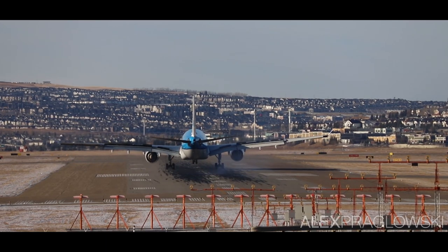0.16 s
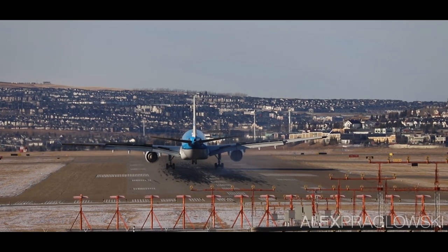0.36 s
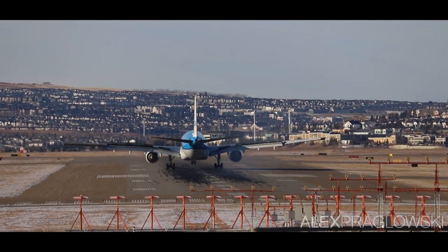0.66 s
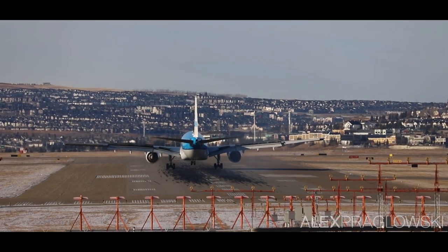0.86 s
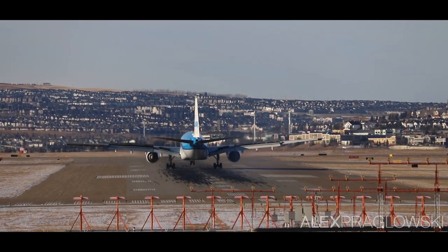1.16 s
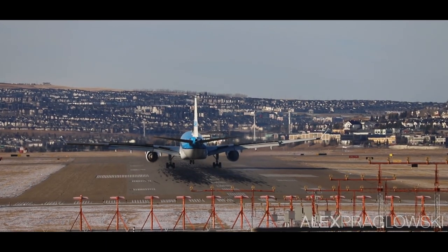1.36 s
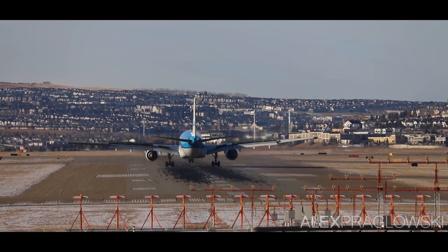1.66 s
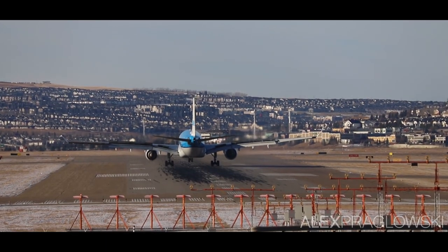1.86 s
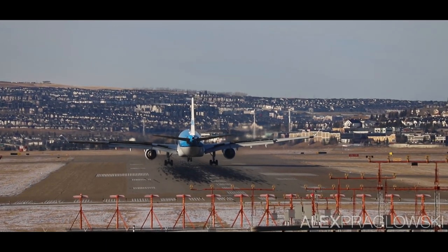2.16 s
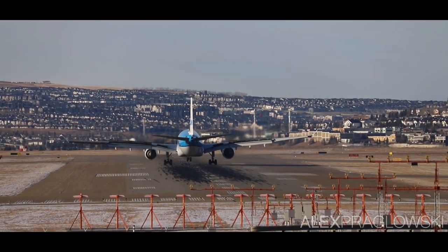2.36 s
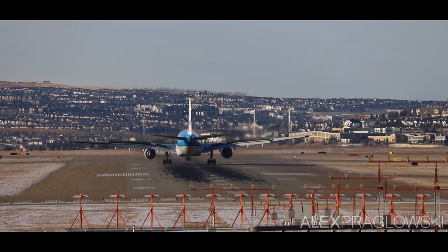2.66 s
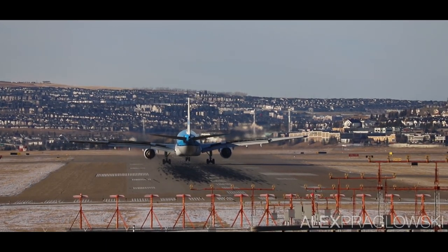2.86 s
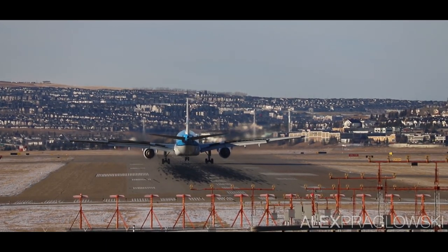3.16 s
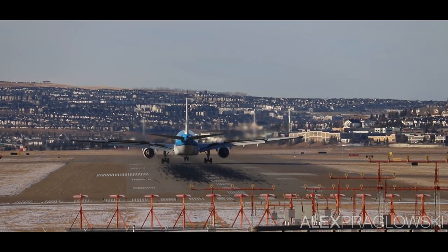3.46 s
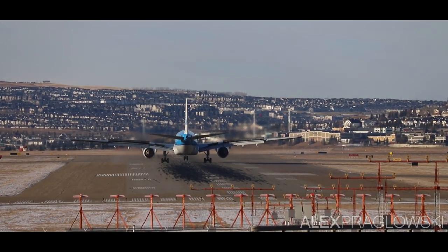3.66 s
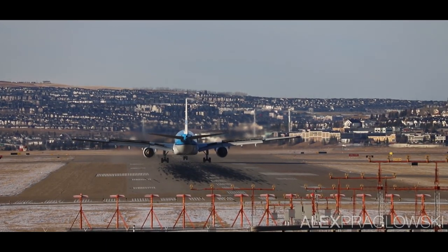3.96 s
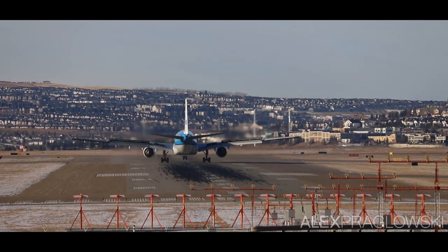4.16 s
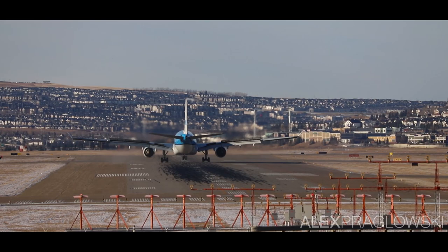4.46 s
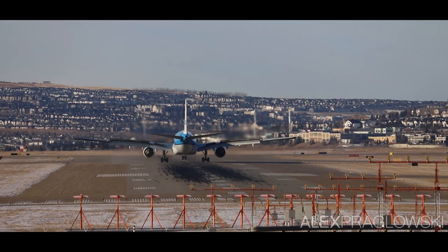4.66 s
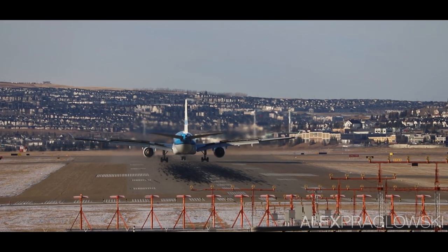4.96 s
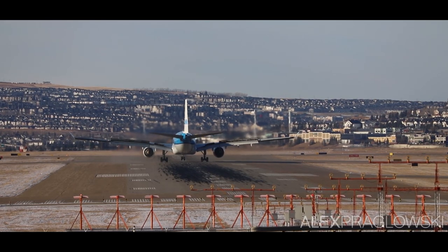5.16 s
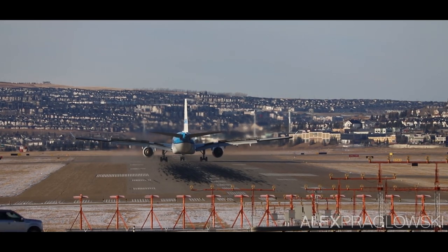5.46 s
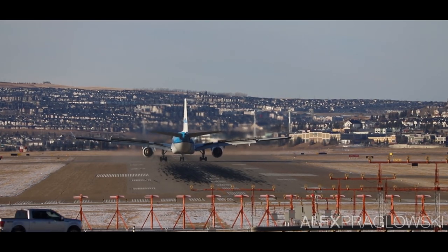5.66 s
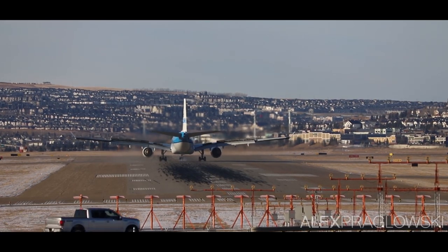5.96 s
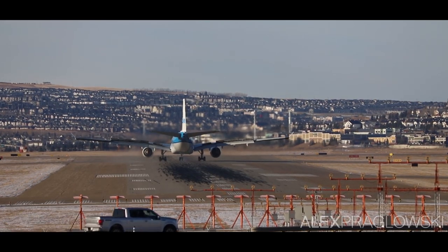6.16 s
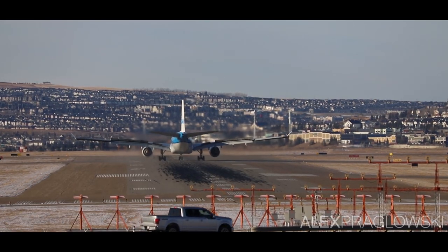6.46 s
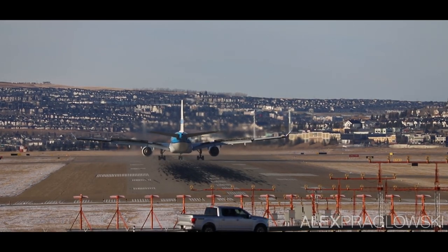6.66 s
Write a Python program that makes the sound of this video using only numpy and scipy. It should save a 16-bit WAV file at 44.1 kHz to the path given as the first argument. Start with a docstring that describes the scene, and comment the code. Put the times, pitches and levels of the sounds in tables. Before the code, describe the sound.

A distant airliner's deep, wavering roar with a thin whine fades along a windy runway, low wind thumps easing before faint gritty tyre crackles.

```python
"""A windy runway: a twin-engine airliner rolls away in reverse thrust while a pickup truck passes on grit.
The engines are shaped noise, a dull roar under a fading rush, with wandering resonant swells.
Two wavering sine tones make the thin fan whine, one of them coming and going.
Low noise in gusts buffets the microphone, coloured noise makes the tyres, sparse cracks make an early
tick and the later grit, and a faint hiss lies beneath. A compressor ducks it all under each gust."""
import sys
import numpy as np
from scipy import signal
from scipy.fft import rfft, irfft, next_fast_len
from scipy.io import wavfile
from scipy.ndimage import uniform_filter1d, map_coordinates

SR = 44100
rng = np.random.default_rng(int(sys.argv[2]) if len(sys.argv) > 2 else 0)


def transcribe(u):
    """Save the signal u as a 16-bit wav file named by the first command-line argument.

    u: samples, shape (n,) or (channels, n), limited to [-1, 1]; the rate is SR.
    q: integer samples, one column per channel.
    """
    v = np.clip(np.atleast_2d(u).T, -1, 1)
    q = np.round(v * 32767).astype(np.int16)
    wavfile.write(sys.argv[1], SR, q)


N = 300179

# All source levels are set ahead of the compressor.
# Colour of the microphone hiss: (frequency [Hz], relative level [dB])
HISS_SPECTRUM = [(800, -13), (2500, 9.5), (4000, 4), (6500, -0.5), (11000, -2), (15500, -4)]
# Colour of the large wind eddies: (frequency [Hz], relative level [dB])
LARGE_EDDY_SPECTRUM = [(8, -22.5), (22, -1), (42, 2), (68, -4.5), (100, -14.5), (150, -26), (300, -32),
                       (1000, -90)]
# Colour of the smaller, higher wind eddies: (frequency [Hz], relative level [dB])
SMALL_EDDY_SPECTRUM = [(30, -18), (62, 1.5), (85, 1.5), (120, -4), (170, -14.5), (300, -26.5),
                       (1000, -80.5)]
# Strength of the breeze, ahead of WIND_LIFT_DB: (time [s], level [dB])
BREEZE_TRACK = [(0, -10.5), (0.75, -14.5), (1.3, -15.5), (2.1, -12.5), (2.9, -16), (3.9, -20.5),
                (4.7, -24.5), (5.25, -29), (5.6, -24), (6.0, -17), (6.8, -20)]
# Gusts and lulls at the microphone: (time [s], gain [dB])
GUSTS_AND_LULLS = [(0.092, 7.5), (0.52, 7.5), (0.62, -1), (0.83, 3.5), (0.93, -1.5), (1.07, 6),
                   (1.15, -4.5), (1.24, -6), (1.41, 3), (1.67, 6), (1.75, -6), (1.95, 4.5), (2.069, 5.5),
                   (2.48, 5), (3.17, 2.5), (3.24, -3), (4.32, 3), (4.58, 4), (4.78, -3.5), (5.0, 5.5),
                   (5.75, -7.5), (5.96, 5), (6.04, -6.5)]
# Colour of tyres, ticks and crunches: (frequency [Hz], relative level [dB])
CRUNCH_SPECTRUM = [(500, -10), (1100, 6), (1400, 6), (1800, 7), (2300, -3), (3100, -10), (3800, -7),
                   (4500, -17), (9000, -26), (15000, -37)]
# Ticks and crunches, an early tick at the microphone, then grit under a tyre:
# (start time [s], level [dB], twice the rise time [s])
TICKS_AND_CRUNCHES = [(0.247, -39.5, .010), (6.05, -52, .06), (6.501, -38, .007), (6.512, -40.5, .004),
                      (6.533, -37, .004), (6.541, -41, .004), (6.565, -49, .005), (6.601, -39.5, .005),
                      (6.610, -40, .004)]
# Swells of the louder fan's whine: (time [s], peak level [dB], half length [s])
FAN_SWELLS = [(0.5, -44, 0.34), (1.48, -46.5, 0.2), (2.9, -43, 0.3)]
# Deep swell of the reversed jets: (time [s], centre frequency [Hz], level [dB])
BOOM_TRACK = [(0, 199.9, -31.5), (2.4, 206.1, -23.5), (2.7, 221.6, -15.5), (3.1, 199.2, -21.5),
              (3.9, 209.6, -25), (4.3, 255, -19), (4.75, 272.2, -21.5), (5.1, 270.1, -18),
              (5.5, 251.6, -21.5), (5.9, 195, -18.5), (6.2, 188.1, -27.5), (6.6, 181.9, -22)]
# Higher, hollow swell: (time [s], centre frequency [Hz], level [dB])
HOWL_TRACK = [(0, 399, -25), (2.2, 400, -28), (3.45, 470.2, -21.5), (3.95, 420, -18.5), (4.2, 334.9, -20.5),
              (4.55, 320.6, -21), (4.8, 437.7, -32), (5.3, 445.3, -21), (5.8, 439.8, -27.5),
              (6.8, 457, -30)]
# Narrow drone of the engines: (time [s], centre frequency [Hz], level [dB])
DRONE_TRACK = [(0, 338.3, -17.5), (0.5, 338.2, -22.5), (0.9, 336.6, -13.5), (1.22, 335, -16.5),
               (1.36, 331.7, -24.5), (1.85, 321, -16.5), (2.55, 332, -23), (2.9, 330, -36.5)]
# Colour of the jet roar: (frequency [Hz], relative level [dB])
ROAR_SPECTRUM = [(30, -22.5), (80, -8), (130, -5), (210, 0), (290, -1), (380, 0), (500, -1.5), (620, -6.5),
                 (760, -15.5), (950, -27), (1500, -53), (3000, -100)]
# Colour of the jet rush: (frequency [Hz], relative level [dB])
RUSH_SPECTRUM = [(400, -27), (750, 7), (950, 1), (1200, -1.5), (1500, -8), (1720, -10.5), (2000, -18.5),
                 (2600, -28), (4000, -41), (8000, -59.5)]
# Brief surges and dips of the rush, carried by the air: (time [s], gain [dB])
RUSH_SURGES = [(0.62, 1.5), (1.29, 0), (2.45, -2), (2.648, -0.5), (3.0, 3.5), (3.76, 1.5), (5.66, 2.5),
               (6.05, 2)]

# Half lengths below are where a bell-shaped swell has fallen to 1/e.
HISS_DB = -56.5
WIND_LIFT_DB = 1.0
GUST_HALF_S, SURGE_HALF_S = 0.048, 0.05
# Small eddies: level over the large ones in a 0 dB wind, then dB gained per dB of wind
SMALL_EDDIES_DB, SMALL_EDDIES_GROW = -1, 0.35
# The pickup: time when nearest, half length, peak level
TYRES_S, TYRES_HALF_S, TYRES_DB = 6.4, 2.2, -55.5
# The whine climbs as the aircraft brakes and its Doppler shift shrinks; BRAKE_S sets the slope
FAN_START_HZ, FAN_END_HZ, BRAKE_MID_S, BRAKE_S = 1615, 1656, 2.45, 0.55
FAN_DB, SECOND_FAN_DB, SECOND_FAN_BELOW_HZ = -59, -59, 33
# The lowest part of the roar swells once: time, half length, centre, peak level
RUMBLE_S, RUMBLE_HALF_S, RUMBLE_HZ, RUMBLE_DB = 3.6, 1.2, 139, -27
# The engines fade steadily as the aircraft rolls away: level at the start, loss
ROAR_DB, ROAR_FADE_DB_PER_S = -15, 0.3453
RUSH_DB, RUSH_FADE_DB_PER_S = -31, 0.94
TOP_HZ = 15730  # upper band limit


def amp(db):
    """Decibels to gain."""
    return 10 ** (np.asarray(db) / 20)


def unit(x):
    """Scale to rms 1."""
    return x / np.sqrt(np.mean(np.abs(x) ** 2) + 1e-20)


def curves(rows):
    """One value per sample for each column after the time."""
    times, *columns = np.transpose(rows)
    return [np.interp(np.arange(N) / SR, times, column) for column in columns]


def wobble(rate):
    """A smooth random curve, rate knots a second."""
    knots = rng.standard_normal(int(N * rate / SR) + 4)
    return map_coordinates(knots, [np.arange(N) * rate / SR])


def bump(s, half_s):
    """A bell that rises to 1 at time s."""
    return np.exp(-((np.arange(N) / SR - s) / half_s) ** 2)


def step(s, rise_s):
    """A smooth change from 0 to 1 around time s."""
    return .5 + .5 * np.tanh((np.arange(N) / SR - s) / (2 * rise_s))


def fading(start, per_s):
    """A value that falls steadily with time."""
    return start - per_s * np.arange(N) / SR


def pulse(age):
    """A push that rises to 1 at age one half and dies away."""
    return 2 * age * np.exp(1 - 2 * age)


def filtered(x, response):
    """x times a response of frequency."""
    size = next_fast_len(N + SR // 2)
    spectrum = rfft(x, size) * response(np.fft.rfftfreq(size, 1 / SR))
    return irfft(spectrum, size)[:N]


def coloured(x, spectrum):
    """x shaped by (frequency, level) points on a log frequency axis, at rms 1."""
    f, db = np.transpose(spectrum)
    return unit(filtered(x, lambda hz: amp(np.interp(np.log(hz + 1), np.log(f), db))))


def turbulence(patchy_db):
    """Noise whose neighbouring bands fade and swell separately, as sound does through eddying air."""
    bands = signal.stft(rng.standard_normal(N), nperseg=1024)[2]
    field = rng.standard_normal(bands.shape)
    field = uniform_filter1d(field, size=9, axis=0)   # smooth across frequency
    field = uniform_filter1d(field, size=10, axis=1)  # smooth across time
    return signal.istft(bands * amp(patchy_db * unit(field)))[1][:N]


def resonance(centre_hz, width_hz):
    """Narrow noise of rms 1 around a moving centre, width_hz across at half amplitude."""
    def skirt(hz):
        return 1 / (1 + (2 * hz / width_hz) ** 2)
    in_phase = filtered(rng.standard_normal(N), skirt)
    quadrature = filtered(rng.standard_normal(N), skirt)
    carrier = np.exp(2j * np.pi * np.cumsum(centre_hz) / SR)
    return unit(np.real((in_phase + 1j * quadrature) * carrier))


def hiss():
    """The faint, steady hiss of the microphone."""
    return amp(HISS_DB) * coloured(rng.standard_normal(N), HISS_SPECTRUM)


def wind():
    """Eddies shed at the microphone push it in low lumps; gusts ride the breeze, stronger wind is brighter."""
    breeze_db, = curves(BREEZE_TRACK)
    gust_db = sum(db * bump(s, GUST_HALF_S) for s, db in GUSTS_AND_LULLS)
    buffet = amp(breeze_db + 1.3 * wobble(10) + gust_db)
    air = rng.standard_normal(N)  # one airflow drives both sizes of eddy
    large = coloured(air, LARGE_EDDY_SPECTRUM)
    small_gain = amp(SMALL_EDDIES_DB) * buffet ** SMALL_EDDIES_GROW
    eddies = unit(large + small_gain * coloured(air, SMALL_EDDY_SPECTRUM))
    # even out the chance loud and soft lumps, so the gusts set the level
    strength = np.sqrt(np.abs(uniform_filter1d(eddies ** 2, size=3000)) + 0.12)
    return amp(WIND_LIFT_DB) * buffet * unit(eddies / strength)


def tyres():
    """The soft rolling noise of the pickup swells as it comes near."""
    return amp(TYRES_DB) * bump(TYRES_S, TYRES_HALF_S) * coloured(rng.standard_normal(N), CRUNCH_SPECTRUM)


def ticks_and_crunches():
    """Each tick or crunch is a quick cluster of tiny cracks."""
    t = np.arange(N) / SR
    pressure = sum(amp(db) * pulse(np.maximum(t - s, 0) / length) for s, db, length in TICKS_AND_CRUNCHES)
    cracks = rng.standard_normal(N) * (rng.random(N) < .2)  # about one sample in five cracks
    return pressure * coloured(cracks, CRUNCH_SPECTRUM)


def fan(pitch_hz, level, waver_hz, flicker_db):
    """One fan's blade-passing tone: a sine that wavers in pitch and flickers in level."""
    phase = 2 * np.pi * np.cumsum(pitch_hz + waver_hz * wobble(30)) / SR
    return level * amp(flicker_db * wobble(13)) * unit(np.sin(phase))


def whine():
    """The two fans turn at slightly different speeds; the air carries the louder one over in swells."""
    pitch_hz = FAN_START_HZ + (FAN_END_HZ - FAN_START_HZ) * step(BRAKE_MID_S, BRAKE_S)
    swell_power = sum((amp(db) * bump(s, half_s)) ** 2 for s, db, half_s in FAN_SWELLS)
    level = np.sqrt(amp(FAN_DB) ** 2 + swell_power)
    first = fan(pitch_hz, level, waver_hz=1.2, flicker_db=1)
    second = fan(pitch_hz - SECOND_FAN_BELOW_HZ, amp(SECOND_FAN_DB), waver_hz=3, flicker_db=2.5)
    return first + second


def swell(track, width_hz, patchy_db):
    """A resonant band of the roar that wanders as the aircraft rolls on, broken up by the eddying air."""
    centre_hz, db = curves(track)
    return amp(db + patchy_db * wobble(14)) * resonance(centre_hz, width_hz)


def swells():
    """Resonant bands of the roar; the drone leads, then gives way to the others."""
    rumble_tone = resonance(np.full(N, RUMBLE_HZ), width_hz=25)
    rumble = amp(RUMBLE_DB) * bump(RUMBLE_S, RUMBLE_HALF_S) * rumble_tone
    boom = swell(BOOM_TRACK, width_hz=76, patchy_db=1.4)
    howl = swell(HOWL_TRACK, width_hz=118, patchy_db=1.1)
    drone = swell(DRONE_TRACK, width_hz=36, patchy_db=0.5)
    return rumble + boom + howl + drone


def jets(roar_db, rush_db):
    """Large eddies roar, small ones rush; the air on the way makes both flutter together."""
    flutter_db = .5 * wobble(19)
    roar = amp(roar_db + flutter_db) * coloured(turbulence(patchy_db=0.66), ROAR_SPECTRUM)
    rush_gain = amp(rush_db + flutter_db + 0.42 * wobble(45))  # the rush has a quicker flicker too
    rush = rush_gain * coloured(turbulence(patchy_db=0.5), RUSH_SPECTRUM)
    return roar + rush


def compressor(x, threshold_db, knee_db, share):
    """The gain drops by a share of whatever the short-term level exceeds the threshold."""
    level_db = 10 * np.log10(np.abs(uniform_filter1d(x ** 2, size=1500)) + 1e-12)
    over_db = knee_db * np.logaddexp(0, (level_db - threshold_db) / knee_db)  # soft knee
    return x * amp(-np.clip(share, 0, 1) * uniform_filter1d(over_db, size=900))


def scene():
    """Hiss, wind, ticks and tyres near by, engines far off."""
    near = hiss() + wind() + tyres() + ticks_and_crunches()
    surge_db = sum(db * bump(s, SURGE_HALF_S) for s, db in RUSH_SURGES)
    roar_db = fading(ROAR_DB, ROAR_FADE_DB_PER_S)
    rush_db = fading(RUSH_DB, RUSH_FADE_DB_PER_S) + surge_db
    engines = whine() + swells() + jets(roar_db, rush_db)
    return (near + engines)[None]


def record(dry):
    """The recorder ducks everything under each gust and keeps nothing above its band limit."""
    held = compressor(dry[0], threshold_db=-14.5, knee_db=0.78, share=0.86)
    opening = step(.004, .0005)  # a very quick fade-in
    return filtered(held * opening, lambda hz: hz < TOP_HZ)[None]


dry = scene()
out = record(dry)
transcribe(out)
```